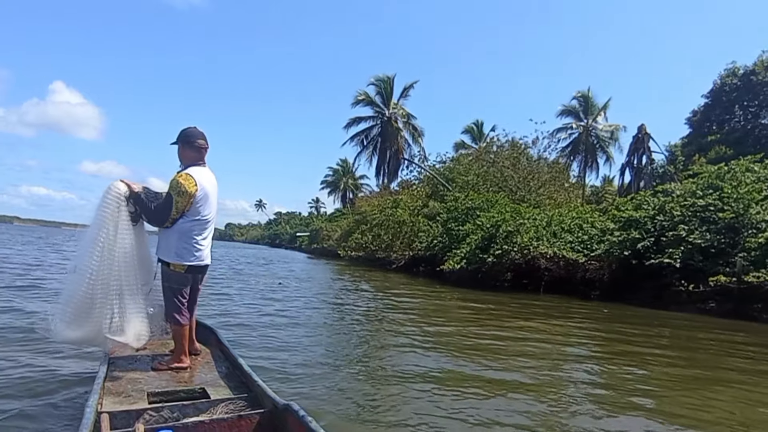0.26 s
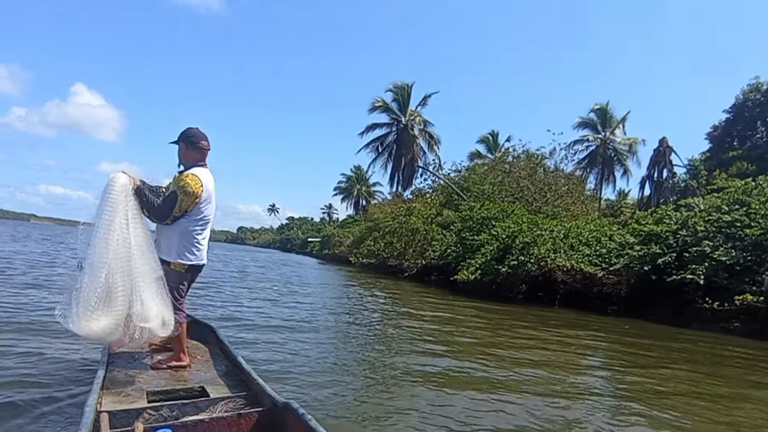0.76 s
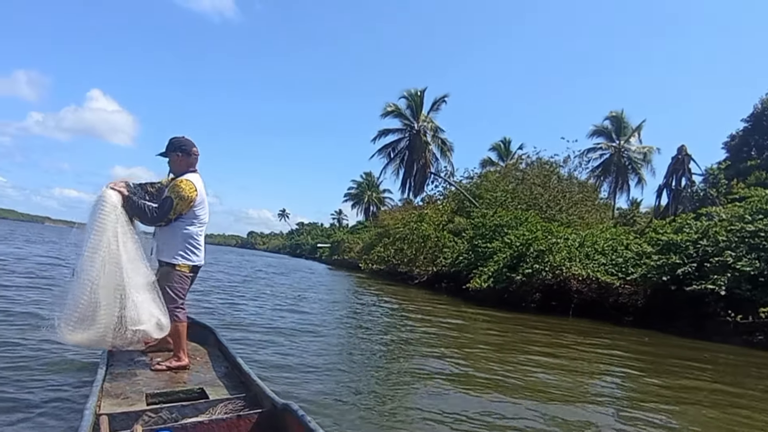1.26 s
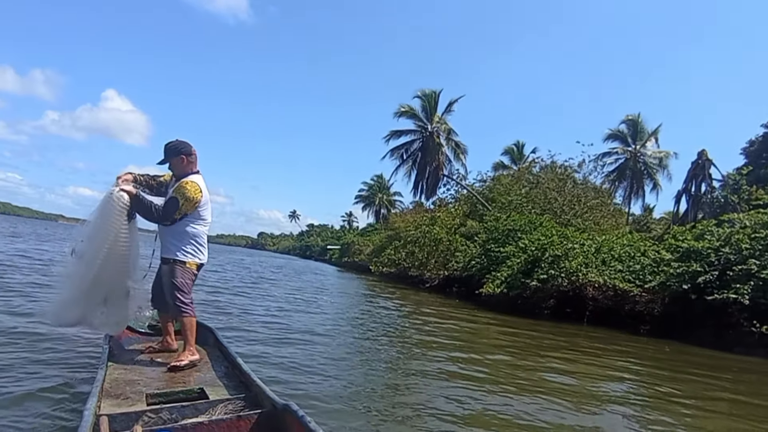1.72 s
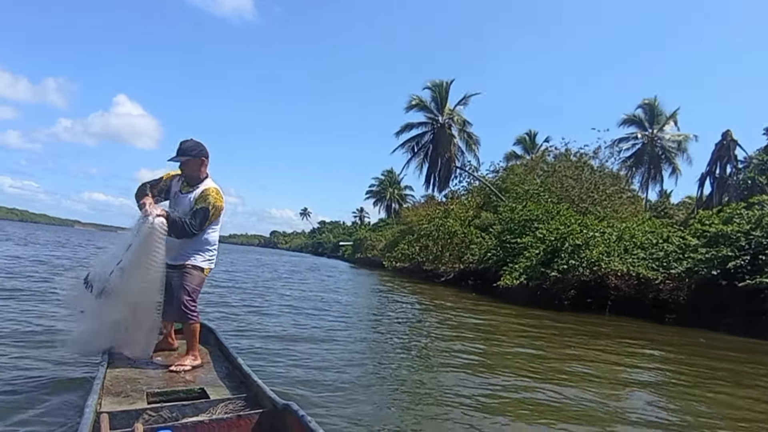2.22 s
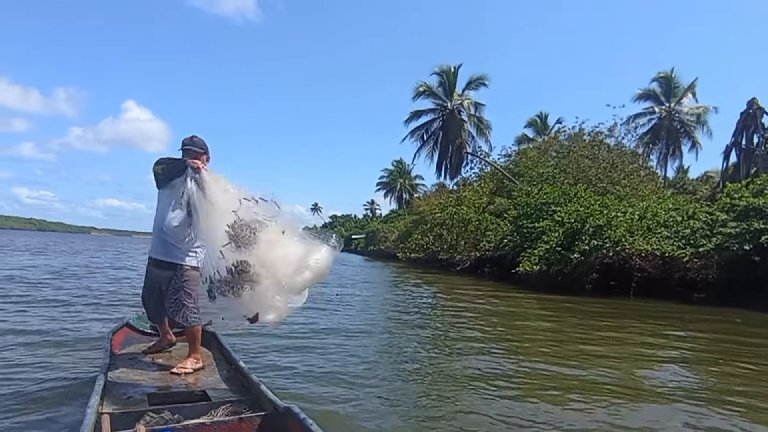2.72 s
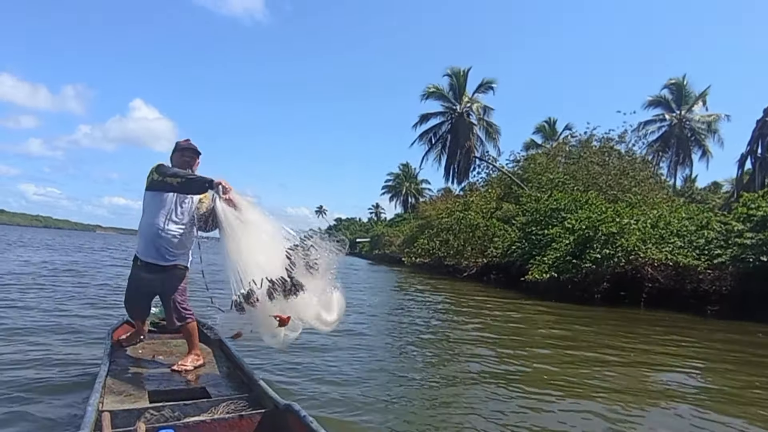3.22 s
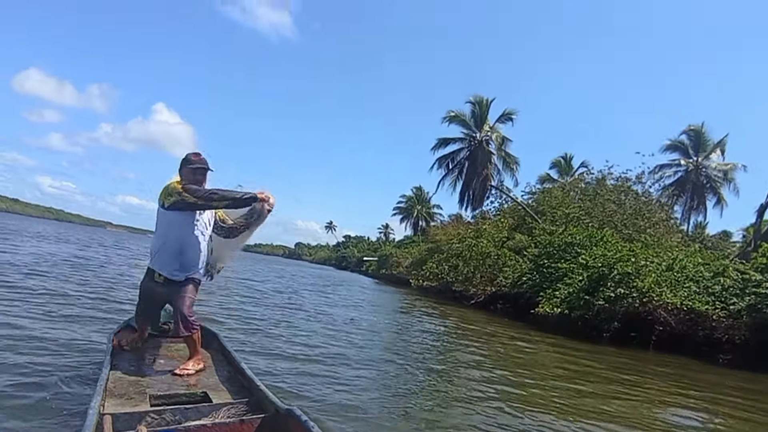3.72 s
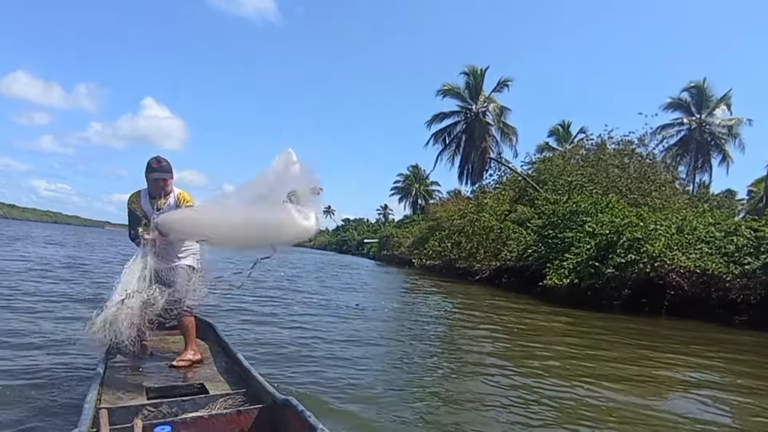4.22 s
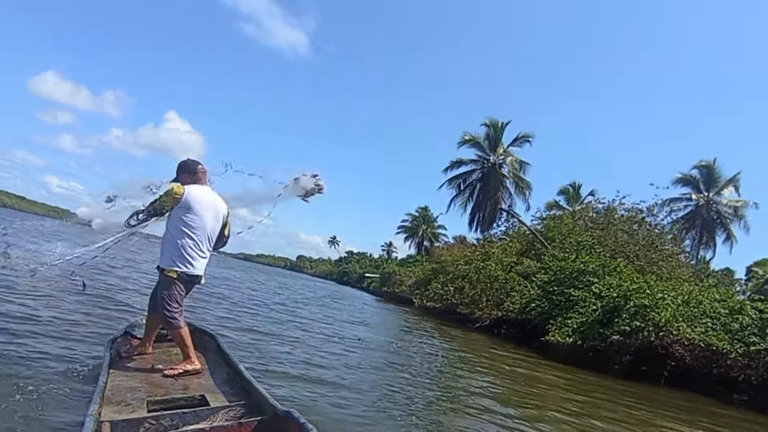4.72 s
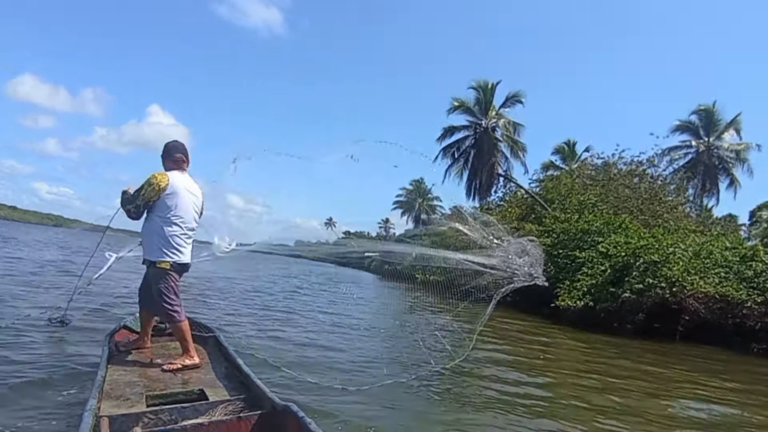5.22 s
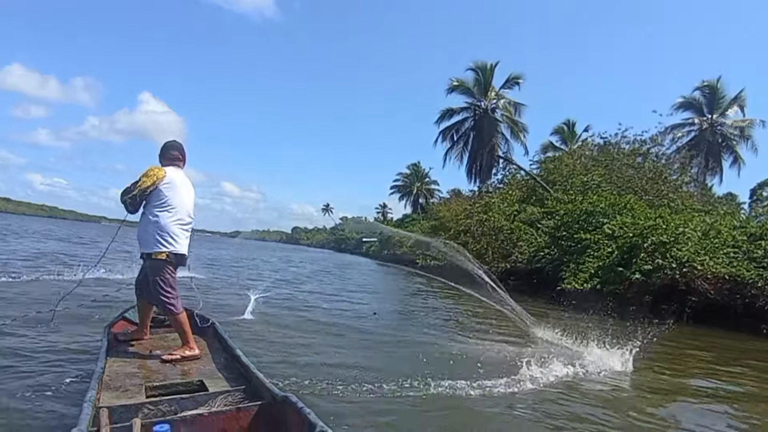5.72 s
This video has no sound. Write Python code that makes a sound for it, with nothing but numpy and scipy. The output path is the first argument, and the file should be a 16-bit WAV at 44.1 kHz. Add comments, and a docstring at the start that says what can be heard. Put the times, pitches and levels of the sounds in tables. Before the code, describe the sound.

Quiet river air with small drips and clicking weights, then hull thuds, a net swishing out and a hissing, clattering splash of many lead weights.

```python
"""Throwing a cast net from a canoe

A fisher stands in a wooden canoe on a calm river, shakes out a wet net, swings it and throws it.
Noise puffs click as lead weights, gliding tones plink as drips, and shoves make the hull thud.
The net is a hiss roughened by tiny impacts plus ringing droplets; its splash adds churning bubbles.
Shaped noise is the soft breeze, lapping and air, and bending tones are far bird whistles.
Two microphone ports colour the whole; all levels in the tables are set before that."""
import sys
import numpy as np
from scipy import signal
from scipy.io import wavfile

SR = 44100
rng = np.random.default_rng(int(sys.argv[2]) if len(sys.argv) > 2 else 0)


def persist_wave(psi):
    """Save psi, clipped to +-1, as 16-bit WAV."""
    counts = np.round(np.clip(psi, -1, 1) * 32767).astype(np.int16)
    wavfile.write(sys.argv[1], SR, np.atleast_2d(counts).T)


N = 262836      # length in samples

# Breeze and lapping on the hull. Each row: time in seconds, level in dB.
RUMBLE_LEVEL = [(0, -50.5), (3.4, -49.5), (3.78, -45.5), (4.63, -44), (4.98, -49), (5.45, -45), (5.6, -42),
                (5.89, -45), (5.96, -52)]
# Tone colour of that rumble. Each row: frequency in Hz, relative strength in dB per Hz.
RUMBLE_SPECTRUM = [(15, -63), (25, -31), (63, -7.5), (80, 2), (228, -2.5), (310, -10), (401, -11),
                   (476, -13), (1030, -27), (1500, -34.5), (1950, -53), (3300, -120)]
# Tone colour of the steady air noise. Each row: frequency in Hz, relative strength in dB per Hz.
AIR_SPECTRUM = [(500, 19), (1000, -46), (2000, 4.5), (4000, -8.5), (8000, -6.5), (12000, -6), (16000, -13)]
# Far bird whistles. Each row: start in seconds, length in seconds, start pitch in Hz, bend pitch in Hz,
# end pitch in Hz, level in dB before the fades.
BIRD_WHISTLES = [(0.14, 0.052, 745, 1106, 930, -70), (0.316, .2, 860, 990, 800, -67.5),
                 (3.05, 0.074, 2230, 2245, 2260, -77), (3.22, .07, 2360, 2270, 2210, -78)]
# Gusts buffeting each port on its own as the canoe rocks. Each row: time in seconds, level in dB.
GUST_LEVEL = [(3.2, -85), (3.9, -60), (4.45, -54), (4.64, -40.5), (4.74, -53), (5.06, -41), (5.16, -56),
              (5.27, -44), (5.96, -44)]
# Drips trapping a bubble. Each row: start in seconds, peak in dB, starting pitch in Hz,
# time to fall by 60 dB in seconds.
DRIP_PLINKS = [(.259, -53, 582, .06), (0.333, -49, 1446, 0.034), (0.61, -59, 1150, 0.044),
               (0.983, -59, 1680, 0.013), (1.071, -40, 374, 0.085), (1.111, -44, 1580, 0.013),
               (1.112, -51, 1320, 0.026), (1.135, -46.5, 393, 0.052), (1.213, -58, 1600, 0.035),
               (1.243, -54, 1480, 0.029), (1.511, -45, 1700, 0.016), (1.657, -55, 1520, 0.022),
               (1.919, -53, 632, 0.13), (2.244, -57, 1470, 0.013), (2.298, -56, 1250, 0.033),
               (2.305, -60, 1560, 0.044), (4.671, -47, 1330, 0.042)]
# Feet and knees on the hull. Each row: start in seconds, peak in dB, time to full force in seconds,
# hardness in dB per octave.
HULL_THUDS = [(3.489, -37.5, 0.0044, -2), (3.742, -30.5, 0.017, -4), (3.781, -32, 0.0089, -2.5),
              (3.966, -29, 0.0024, 6), (4.028, -25, 0.0036, 0), (4.048, -30, 0.011, -6.5),
              (4.197, -20.5, 0.0044, -1), (4.246, -23.5, 0.0057, -3), (4.402, -27.5, 0.005, 1),
              (4.429, -28.5, 0.0049, -6.5), (4.645, -30, 0.014, -17), (4.748, -26.5, 0.00124, 12.5),
              (4.982, -22, 0.0065, -0.5), (5.272, -27.5, 0.0062, 4), (5.416, -19.5, 0.0049, 0.5),
              (5.447, -24, 0.0018, 3), (5.93, -29, 0.0095, -17)]
# Ways the hull rings. Each row: pitch in Hz, relative drive in dB,
# ring time in seconds (falling by 60 dB takes about 1.8 times as long).
HULL_MODES = [(93.6, -7, 0.13), (123.6, -3.5, 0.081), (157.6, 5.5, 0.12), (217.3, 1, 0.073),
              (295.7, -6, 0.049), (404, -9, 0.039), (495.4, -8.5, 0.039), (655, -19, 0.014),
              (826, -23, 0.04), (1250, -31, 0.0065)]
# Small weights jostling while the net is shaken out. Each row: time in seconds, level in dB.
RATTLE_LEVEL = [(1.44, -85), (1.48, -62), (1.53, -68), (1.56, -57), (1.72, -59), (1.85, -59), (1.96, -66),
                (2.04, -66), (2.09, -82)]
# Rings of those weights. Each row: pitch in Hz, width in Hz, relative level in dB.
WEIGHT_MODES = [(1700, 300, -14), (3220, 290, -2), (4800, 960, -3.5), (7360, 530, 3), (12700, 1700, 1)]
# Weights striking each other, the planks or the water. Each row: start in seconds, peak in dB,
# ring pitch in Hz, plank knock peak in dB, top crackle peak in dB, left over right in dB.
WEIGHT_CLICKS = [(.108, -49, 6900, -66, -66, 6), (1.043, -51, 3800, -60, -76, -1),
                 (1.07, -53, 2190, -50, -78, 6), (1.4297, -46.5, 3800, -59, -72, -1),
                 (1.477, -52, 8020, -63, -62, 6), (1.503, -46, 7470, -50, -59, 6),
                 (1.551, -34.5, 7900, -71, -50, 0), (1.5878, -46.5, 7400, -67, -55, 13),
                 (1.609, -46, 3040, -75, -61, 6), (1.6403, -43.5, 5900, -70, -63, 10),
                 (1.676, -39.5, 3530, -70, -55, -2), (1.6911, -39.5, 7640, -62, -63, 7),
                 (1.734, -48, 7700, -53, -52, 16), (1.755, -48, 7670, -54, -58, 3),
                 (1.7714, -47, 7400, -58, -49, 8), (1.7854, -35.5, 7800, -52, -42, 2),
                 (1.803, -50, 7450, -58, -43, 2), (1.8322, -42.5, 3220, -45, -35, 3),
                 (1.8762, -45, 7540, -46.5, -51, 2), (1.9129, -40, 7060, -65, -55, 12),
                 (1.946, -46, 4970, -50, -72, 6), (2.0118, -45.5, 2670, -64, -70, 1.5),
                 (2.0211, -39, 4600, -63, -55, 3), (2.2419, -43, 3030, -63, -67, 2),
                 (2.5247, -47.5, 3600, -68, -65, -1), (2.929, -47, 4800, -71, -78, -4),
                 (3.4096, -47, 4010, -66, -61, 3), (3.434, -42, 4030, -69, -63, 3),
                 (3.4893, -64, 2410, -40.5, -61, -2), (3.505, -45, 8000, -49, -58, 4),
                 (3.6332, -44, 3460, -66, -51, -3.5), (3.6494, -48, 8800, -70, -50, 0),
                 (3.675, -42, 3650, -38.5, -58, 9), (3.8664, -45, 8800, -56, -58, 0),
                 (3.9701, -38, 1970, -44, -66, -18), (3.9744, -28.5, 2570, -41, -73, 4),
                 (3.9811, -29.5, 3640, -34.5, -70, 5.5), (4.1984, -52, 2000, -53, -58, 12),
                 (4.2576, -35, 2270, -68, -68, 4), (4.4966, -29, 4240, -38, -45, -1),
                 (4.599, -33.5, 3700, -36.5, -35, 1), (4.6103, -32, 8400, -46, -44, -19),
                 (4.6964, -49, 3180, -48, -37, 1.5), (4.7452, -35, 4300, -30, -51, -20),
                 (4.7536, -44, 5830, -40.5, -58, 19), (4.8345, -46, 3870, -48, -56, 9),
                 (4.9142, -47, 7530, -53, -33.5, 5), (4.9347, -38, 7410, -46, -60, 3),
                 (4.9836, -35, 2030, -35.5, -64, 8), (5.0405, -36, 2620, -39, -75, -9),
                 (5.136, -38, 3340, -46, -42, 0), (5.1687, -58, 2380, -54, -36, 3),
                 (5.2495, -40, 9000, -60, -48, 0), (5.2691, -20.5, 2630, -28, -57, -5),
                 (5.2792, -18.5, 2620, -29.5, -55, -2), (5.2828, -30.5, 3400, -31, -51, -25),
                 (5.3374, -26, 3330, -43, -23, -4.5), (5.3608, -40, 1800, -48, -55, -3),
                 (5.4247, -27.5, 2780, -35, -57, -13), (5.5772, -22.5, 5700, -34, -49, 0),
                 (5.5874, -26, 2520, -26, -52, -2), (5.5949, -19.5, 2640, -26.5, -56, 0),
                 (5.6297, -34, 2380, -31, -55, -7), (5.8203, -31, 7450, -36.5, -44, 3)]
# Water churned by the sinking rim. Each row: time in seconds, level in dB.
CHURN_LEVEL = [(5.26, -100), (5.29, -54), (5.33, -47.5), (5.5, -39), (5.69, -35.5), (5.86, -38),
               (5.96, -43.5)]
# Tone colour of the churn. Each row: frequency in Hz, relative strength in dB.
CHURN_SPECTRUM = [(110, -36), (180, -15), (263, -16), (294, 1.5), (334, -4.5), (543, -4), (1200, -22),
                  (1560, -49), (2640, -120)]
# Wet net rustling, shedding spray and raining on the water. Each row: time in seconds,
# hiss level in dB, brightness in dB per octave.
SPRAY_LEVEL = [(0, -63.5, 1), (.3, -69.5, 1.5), (1.44, -67, -1.5), (1.6, -64, 1.5), (1.93, -64, -2),
               (2.12, -67, 1), (3.37, -69.5, 0), (3.45, -59, 2), (3.84, -57, -0.5), (3.89, -63, 0),
               (4.1, -61.5, -0.5), (4.33, -56, -0.5), (4.55, -50.5, 1.5), (4.8, -54.5, 0.5),
               (4.95, -52.5, -1.5), (5.25, -58.5, -1), (5.3, -50.5, 0.5), (5.35, -42.5, -2),
               (5.5, -44.5, -1), (5.96, -45, 0)]
# Tone colour of the spray. Each row: frequency in Hz, relative strength in dB per Hz.
SPRAY_SPECTRUM = [(500, -17), (1000, 0), (1600, 2), (2300, -2.5), (3600, -0.5), (4600, -5.5), (6300, -4.5),
                  (8000, -2.5), (11000, -5.5), (16000, -10)]
# Short swishes of the mesh and sheets of spray, hiss only. Each row: peak time in seconds, peak in dB,
# rise time in seconds, brightness in dB per octave.
NET_SWISHES = [(1.7, -66, 0.045, 2.5), (2.25, -64.5, .05, 1.5), (2.55, -67, 0.064, 0),
               (2.92, -70, .03, 2.5), (3.57, -60, 0.027, .5), (3.79, -60, .06, 0), (4.205, -52, .022, .5),
               (4.611, -45, 0.02, 3), (5.345, -47, .012, 3), (5.43, -39.5, 0.039, -4), (5.595, -46, .02, 4),
               (5.65, -44, .04, -2), (5.83, -57, 0.026, 0)]
# How alike left and right are in spread-out noise. Each row: frequency in Hz,
# likeness from -1 (opposite) to 1 (equal).
LEFT_RIGHT_LIKENESS = [(60, 0.75), (150, 0.96), (380, 0.8), (950, -0.27), (2380, -0.066), (5980, 0.084),
                       (15000, -0.24)]
# Resonances and dips of each microphone port. Each row: frequency in Hz, width in Hz, lift in dB.
LEFT_PORT_BANDS = [(3160, 2100, 2.5), (5200, 1740, 9.5), (5950, 670, -3.5), (7640, 390, 5.5),
                   (12200, 4700, -2)]
RIGHT_PORT_BANDS = [(3400, 2170, 8.5), (5460, 1260, -1.5), (8500, 4300, 6), (11000, 4800, 2),
                    (12850, 14400, -14.5)]

AIR_DB = -70.5
WHISTLE_FADE_S, WHISTLE_SCOOP_S = 0.023, 0.03
WHISTLE_BEND = 2.17      # above 1, the glide to the end pitch comes late
CLICK_T60_S, PLANK_T60_S, CLICK_ATTACK_S = 0.012, 0.053, 0.0012      # T60: time to fall by 60 dB
PLANK_HZ, PLANK_WIDTH_HZ = 740, 850
BLOW_SHARE = 0.62        # strength of the first contact within a knock on the plank
SWISH_FALL = 1.28        # fall time as a multiple of the rise
QUIET_DB, PATTER_DB = -68, -5      # droplets against the hiss, when the hiss is at QUIET_DB
PATTER_THINS = 0.3       # dB the droplets lose against the hiss for each dB the hiss gains
LEFT_LAG_S = 0.00012
CUTOFF_HZ = 16300


def from_db(db):
    """Turns dB into a plain factor."""
    return 10 ** (np.asarray(db) / 20)


def rms_one(x):
    """Scales a signal to an average (rms) level of 1."""
    return x / np.sqrt(np.mean(x ** 2) + 1e-20)


def in_time(rows):
    """Joins the points of each column by straight lines in time."""
    s, *columns = np.transpose(rows)
    return [np.interp(np.arange(N) / SR, s, column) for column in columns]


def at_hz(points, hz):
    """Reads a table at a frequency, with straight lines on a pitch scale."""
    table_hz, values = np.array(points).T
    return np.interp(np.log(hz), np.log(table_hz), values)


def drift(rate):
    """Wanders slowly at random with spread 1; rate in Hz says how quickly."""
    step = 40      # samples between computed points
    r = np.exp(-2 * np.pi * step * rate / SR)
    noise = rng.standard_normal(N // step + 2002)
    slow = signal.lfilter([1], [1, -2 * r, r * r], noise)[2000:]      # skip the filter's start
    return np.interp(np.arange(N) / step, np.arange(len(slow)), rms_one(slow))


def resonance(x, hz, width_hz):
    """Rings in one band, like a struck object, with gain 1 at its top."""
    r = np.exp(-np.pi * width_hz / SR)
    poles = [1, -2 * r * np.cos(2 * np.pi * hz / SR), r * r]
    return signal.lfilter([(1 - r * r) / 2, 0, (r * r - 1) / 2], poles, x)


def peaking(x, hz, width_hz, db):
    """Lifts or dips one band."""
    a, w = from_db(db / 2), 2 * np.pi * hz / SR
    q = np.sin(w) * width_hz / hz / 2
    top = [1 + q * a, -2 * np.cos(w), 1 - q * a]
    bottom = [1 + q / a, -2 * np.cos(w), 1 - q / a]
    return signal.lfilter(top, bottom, x)


def add(track, s, piece, db):
    """Lays a piece with the given peak level into a track."""
    i = round(s * SR)
    piece = piece[:N - i]
    track[..., i:i + len(piece)] += np.multiply.outer(from_db(db), piece / np.max(np.abs(piece)))


def banded(source, spectrum, low_hz, top_hz, patchy_db, rate, slope_db=0):
    """Colours noise in narrow bands, each with its own flicker and left-right likeness; rms 1."""
    out, together = 0, drift(rate / 4)
    edges = np.geomspace(low_hz, top_hz, round(2.5 * np.log2(top_hz / low_hz)) + 1)
    for k, (low, high) in enumerate(zip(edges, edges[1:])):
        band = signal.butter(2, [low, high], "band", fs=SR, output="sos")
        mid, side = signal.sosfilt(band, source[k % 2])      # neighbours use separate noise
        hz = np.sqrt(low * high)
        alike = np.clip(at_hz(LEFT_RIGHT_LIKENESS, hz), -1, 1)
        flicker_db = patchy_db * (0.36 * together + drift(rate))
        gain = from_db(at_hz(spectrum, hz) + slope_db * np.log2(hz / 4000) + flicker_db)
        out = out + gain * (np.sqrt(1 + alike) * mid + np.sqrt(1 - alike) * side * [[1], [-1]])
    return rms_one(out)


def grains(per_s, spread_db, shape):
    """Scatters random single-sample impacts of very uneven size."""
    sizes_db = spread_db * np.minimum(rng.exponential(1, shape), 5)
    sizes = from_db(sizes_db) * rng.choice([-1, 1], shape)
    return sizes * (rng.random(shape) < per_s / SR)


def both_ports(x, lag_s):
    """Delays the left channel a little, as sound reaches the left port later."""
    t = np.arange(N)
    return np.array([np.interp(t - lag_s * SR, t, x[0]), x[1]])


def air():
    """Steady faint noise of the open air, with a gentle flicker in each band."""
    white = rng.standard_normal((2, 2, N))
    return from_db(AIR_DB) * banded(white, AIR_SPECTRUM, 519, 17100, patchy_db=1.5, rate=1.8)


def rumble():
    """Breeze and lapping on the hull: low noise that swells and flickers."""
    level_db, = in_time(RUMBLE_LEVEL)
    white = rng.standard_normal((2, 2, N))
    return from_db(level_db) * banded(white, RUMBLE_SPECTRUM, 26.63, 1485, patchy_db=1.2, rate=12)


def birds():
    """Pure whistles from the bank bend quickly to a second pitch, then glide late to the end pitch."""
    out, t = np.zeros(N), np.arange(N) / SR
    for s, length, from_hz, bend_hz, to_hz, db in BIRD_WHISTLES:
        scoop = np.clip(1 - (t - s) / WHISTLE_SCOOP_S, 0, 1) ** 2
        glide_time = (t - s - WHISTLE_SCOOP_S) / (length - WHISTLE_SCOOP_S)
        glide = np.clip(glide_time, 0, 1) ** WHISTLE_BEND
        hz = bend_hz + (from_hz - bend_hz) * scoop + (to_hz - bend_hz) * glide
        fades = np.clip(np.minimum(t - s, s + length - t) / WHISTLE_FADE_S, 0, 1)
        shape = fades * from_db(-9 * glide)      # weaker towards the end
        out += np.sqrt(2) * from_db(db) * shape * np.sin(2 * np.pi * np.cumsum(hz) / SR)
    return out


def gusts():
    """Moving air makes lumpy low noise, unrelated in the two ports."""
    level_db, = in_time(GUST_LEVEL)
    band = signal.butter(3, [65, 120], "band", fs=SR, output="sos")
    low = signal.sosfilt(band, rng.standard_normal((2, N)))
    lumps_db = 3.0 * np.array([drift(6), drift(6)])
    return from_db(level_db + lumps_db) * rms_one(low)


def drips():
    """A trapped bubble rings, and its pitch rises as it nears the surface."""
    out, t = np.zeros((2, N)), np.arange(4000) / SR
    for s, db, hz, t60 in DRIP_PLINKS:
        tone = np.sin(2 * np.pi * hz * (t + 2.3 * t ** 2))
        plink = tone * from_db(-60 * t / t60) * np.minimum(t / 0.0013, 1)
        add(out, s, plink, db + np.zeros(2))
    return out


def thuds():
    """A lumpy shove sets the hull ringing; a harder contact favours the high rings."""
    out, t = np.zeros((2, N)), np.arange(9000) / SR
    for s, db, rise, hard_db in HULL_THUDS:
        shove = rng.standard_normal(9000) * t / rise * np.exp(-t / rise)
        # The heel lands as one blow within the shove.
        shove[round(rise * SR / 2)] += 0.66 * np.sqrt(np.sum(shove ** 2))
        body = 0
        for k, (hz, mode_db, t60) in enumerate(HULL_MODES):
            drive_db = mode_db + rng.normal(0, 2.0) + hard_db * np.log2(hz / 200)
            ring = resonance(resonance(shove, hz, 1.13 * hz), hz, 1.2 / t60)
            body = body + from_db(drive_db) * ring * (-1) ** k
        add(out, s, body, db + np.zeros(2))
    return out


def rattle():
    """Many tiny ticks, each exciting the rings of the weights by uneven amounts."""
    level_db, = in_time(RATTLE_LEVEL)
    ticks, rings = grains(300, 3.5, N), 0
    for hz, width_hz, db in WEIGHT_MODES:
        share = from_db(rng.normal(0, 6.0, N))
        rings = rings + from_db(db) * rms_one(resonance(ticks * share + 1e-18, hz, width_hz))
    return from_db(level_db) * rms_one(rings) * from_db([[2.0], [-2.0]])      # louder on the left


def clicks():
    """A dying puff of noise rings in one band, crackles at the top and knocks the plank below."""
    out, t = np.zeros((2, N)), np.arange(2600) / SR
    for s, db, hz, plank_db, top_db, pan_db in WEIGHT_CLICKS:
        bright, dull = rng.standard_normal((2, 2600))
        puff = bright * from_db(-60 * t / CLICK_T60_S) * np.minimum(t / CLICK_ATTACK_S, 1)
        pan = pan_db * np.array([0.5, -0.5])
        ring = resonance(puff, hz, 0.17 * hz) + 0.22 * resonance(puff, hz, 1.2 * hz)
        add(out, s, ring, db + pan)
        add(out, s, resonance(puff, 13000, 3100), top_db + pan)
        contact = dull * from_db(-60 * t / PLANK_T60_S)
        contact[round(CLICK_ATTACK_S * SR)] += BLOW_SHARE * np.sqrt(np.sum(contact ** 2))
        knock = resonance(contact, PLANK_HZ, PLANK_WIDTH_HZ)
        add(out, s, resonance(knock, PLANK_HZ, 2 * PLANK_WIDTH_HZ), plank_db + np.zeros(2))
    return out


def canoe(x, wet_db, t60, dull_hz):
    """Adds short, dull scatter from planks and water, unrelated in the two ports."""
    t = np.arange(round(t60 * SR)) / SR
    fade = from_db(-60 * t / t60) * np.minimum(t / 0.0013, 1)
    tail = rng.standard_normal((2, len(t))) * fade
    tail = signal.lfilter(*signal.butter(1, [180, dull_hz], "band", fs=SR), tail)
    tail = tail / np.sqrt(np.sum(tail ** 2, axis=1, keepdims=True))
    return x + from_db(wet_db) * signal.fftconvolve(x, tail, axes=1)[:, :N]


def churn():
    """Big bubbles under the rim come in lumps and ring a few cycles, from 200 to 1100 Hz."""
    level_db, = in_time(CHURN_LEVEL)
    born = grains(1200, 3.0, N) * from_db(2.2 * drift(15))
    pitches, dealt = np.geomspace(200, 1100, 18), rng.integers(0, 18, N)
    rings = []
    for k, hz in enumerate(pitches):
        bubbles = born * (dealt == k) + 1e-18
        ring = resonance(resonance(bubbles, hz, hz * 0.17), hz, hz * 0.58)
        rings.append(from_db(at_hz(CHURN_SPECTRUM, hz)) * ring)
    mid = sum(rings)
    side = 0.3 * (sum(rings[::2]) - sum(rings[1::2]))      # bubbles lie left and right
    return from_db(level_db) * rms_one(np.array([mid + side, mid - side]))


def droplets(level_db, slope_db):
    """Each droplet rings a few cycles at a pitch of its own, picked from sixteen."""
    born, dealt = grains(900, 5.4, N), rng.integers(0, 16, N)
    patter = 0
    for k, hz in enumerate(np.geomspace(1400, 15000, 16)):
        hits = born * (dealt == k) + 1e-18
        ring = resonance(resonance(hits, hz, hz * 0.18), hz, hz * 0.5)
        patter = patter + from_db(at_hz(SPRAY_SPECTRUM, hz) + slope_db * np.log2(hz / 4000)) * ring
    patter_db = level_db + PATTER_DB - PATTER_THINS * (level_db - QUIET_DB)
    patter = from_db(patter_db) * rms_one(patter)
    return both_ports([patter, patter], LEFT_LAG_S)


def spray():
    """The wet net: a hiss roughened by tiny impacts, with swishes, and ringing droplets."""
    level_db, slope_db = in_time(SPRAY_LEVEL)
    t, power = np.arange(N) / SR, from_db(2 * level_db)
    tilt = power * slope_db
    for s, db, rise, bright_db in NET_SWISHES:
        width = np.where(t < s, rise, SWISH_FALL * rise)
        swish = from_db(2 * db) * np.exp(-((t - s) / width) ** 2)
        power, tilt = power + swish, tilt + swish * bright_db
    drops = np.abs(rms_one(grains(1500, 3.6, N)))
    gate = 0.92 + signal.lfilter([0.1], [1, -0.9], drops)      # a puff a fraction of a ms long
    hiss = banded(gate * rng.standard_normal((2, 2, N)), SPRAY_SPECTRUM, 482, 16200,
                  patchy_db=2.5, rate=20.0, slope_db=tilt / power)      # louder parts weigh more
    return np.sqrt(power) * hiss + droplets(level_db, slope_db)


def scene():
    """Adds the background, the sounds in the canoe and the net and its splash."""
    background = air() + rumble() + birds() + gusts()
    near = canoe(drips() + thuds() + rattle() + clicks(), wet_db=-11, t60=0.05, dull_hz=4000)
    return background + both_ports(near, LEFT_LAG_S) + churn() + spray()


def record(dry):
    """Each port colours the sound in its own way; the top is cut."""
    left, right = dry
    for hz, width_hz, db in LEFT_PORT_BANDS:
        left = peaking(left, hz, width_hz, db)
    for hz, width_hz, db in RIGHT_PORT_BANDS:
        right = peaking(right, hz, width_hz, db)
    return signal.sosfilt(signal.cheby2(14, 70, CUTOFF_HZ, fs=SR, output="sos"), [left, right])


dry = scene()
out = record(dry)
persist_wave(out)
```